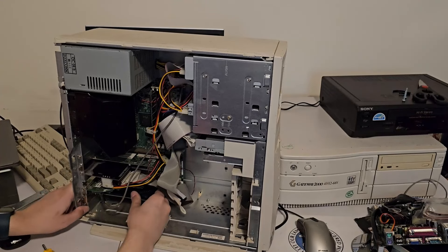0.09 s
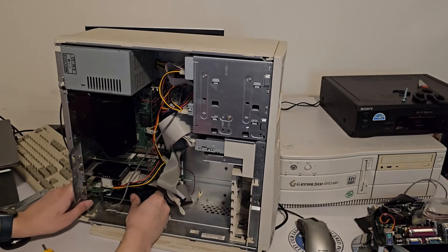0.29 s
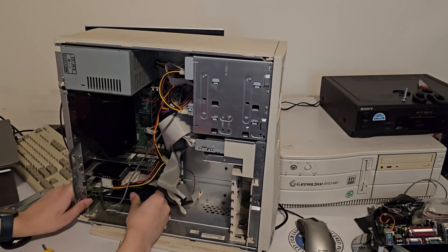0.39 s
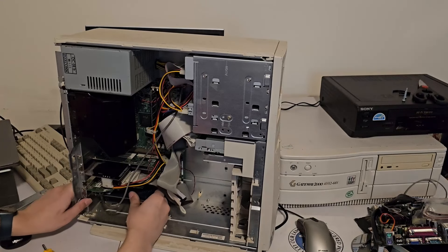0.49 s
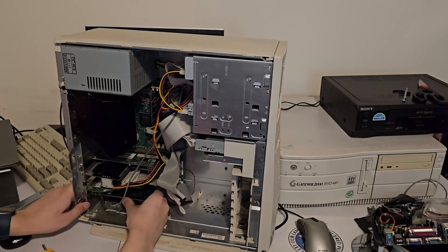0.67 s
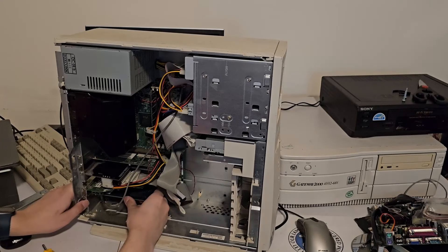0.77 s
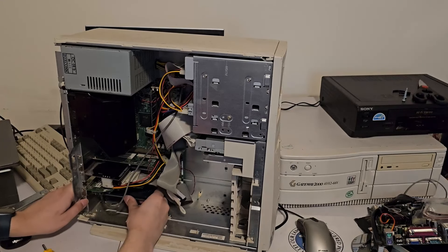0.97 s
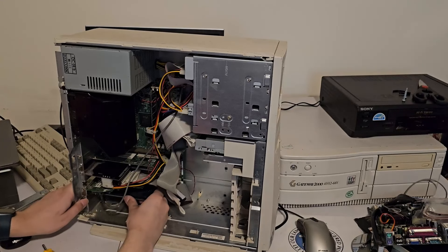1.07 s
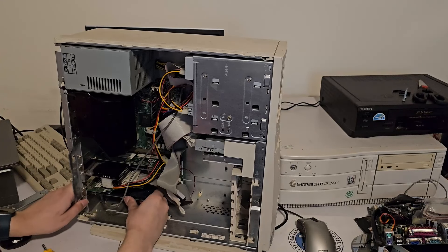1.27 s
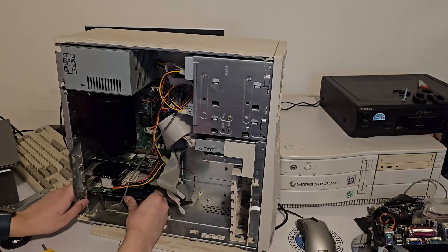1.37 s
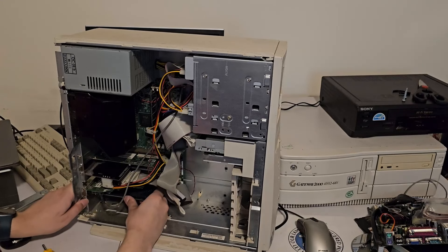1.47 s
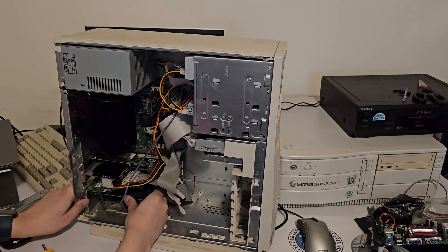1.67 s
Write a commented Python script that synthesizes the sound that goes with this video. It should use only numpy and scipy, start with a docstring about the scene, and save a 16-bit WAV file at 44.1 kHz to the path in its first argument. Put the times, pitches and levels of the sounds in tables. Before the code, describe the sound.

One hard metal snap against a thin steel case, with chattering contacts and a low desk thud, followed by very faint rubbing, a soft tick and a small late click, recorded close in a quiet room.

```python
"""A steel card bracket snaps into the slot frame of an open computer case on a desk, in a small room.
After one faint scrape it catches, slams home and chatters: noise bands make the clang and the ring,
and fading sine waves make the clear notes. A low sine swells as the desk shudders.
Faint scrapes, made of tiny random slips, and a soft tick follow as the card is pressed down.
A second, lighter click comes near the end. Shaped noise gives the quiet room throughout."""
import sys
import numpy as np
from scipy import signal
from scipy.fft import rfft, irfft
from scipy.io import wavfile

SR = 44100
rng = np.random.default_rng(int(sys.argv[2]) if len(sys.argv) > 2 else 0)


def output_pcm(signal):
    """Save a mono or channel-first signal as 16-bit PCM at the path in sys.argv[1].

    Samples are clipped to [-1, 1] before scaling.
    """
    pcm = np.clip(np.atleast_2d(signal).T, -1, 1) * 32767
    wavfile.write(sys.argv[1], SR, np.round(pcm).astype(np.int16))


N = 74970  # length of the scene in samples

# bracket striking the frame: start_s, level_db, extra_bass_db, extra_treble_db, extra_ring_db
BRACKET_KNOCKS = [(0.2121, -10, 12.5, -3.5, 2.5), (0.2158, -6.5, 8.5, 2, -3.5),
                  (0.2173, -.5, -8.5, 0.5, -2.5), (.2218, -5, 4.5, -3.5, -2), (.2335, -16, 3, 0, 0),
                  (1.1496, -41.5, 7, -18.5, -3), (1.5868, -25, -35, -16, -0.5), (1.5945, -27.5, -9, -9, -5),
                  (1.606, -35.5, -2, -4, -8.5), (1.642, -46, 9.5, -38, 5)]
# noisy sound of the sheet metal: pitch_hz, clang_db per octave, lingering_ring_db per octave
SHEET_METAL = [(70, -57, -60), (150, -65, -65.5), (207, -53.5, -47), (315, -47, -47.5), (400, -46, -46),
               (505, -30, -37.5), (796.6, -23.5, -34), (994, -26.5, -33.5), (1320, -30, -37.5),
               (1570, -26, -32), (2020, -27.5, -35.5), (2500, -31, -36), (3880, -24, -31.5),
               (5000, -22, -33), (6540, -26.5, -36), (7400, -19, -27.5), (10800, -34, -41.5),
               (12703, -25, -38.5), (16070, -24, -34)]
# how fast the first clang dies away: pitch_hz, time_to_fall_60_db_s
CLANG_FADE = [(400, .07), (900, 0.039), (2000, .05), (5000, 0.026), (14000, 0.031)]
# how fast the lingering ring dies away in the room: pitch_hz, time_to_fall_60_db_s
RING_FADE = [(150, .45), (400, 0.18), (1000, 0.17), (2000, 0.2), (4500, 0.26), (8000, 0.2), (15000, 0.19)]
# extra bass is full below BASS_HZ, extra treble above TREBLE_HZ; both reach zero at the middle
BASS_HZ, MIDDLE_LOW_HZ, MIDDLE_HIGH_HZ, TREBLE_HZ = 240, 850, 3750, 13000
RING_RISE_S = 0.0042
# the case keeps humming faintly after a blow (HUM_DB is relative to the ring)
HUM_DB, HUM_T60_S, HUM_HZ, HUM_OCTAVES = -27, 0.84, 1100, 2.0
RATTLE_DB = 2.5  # depth of the rattle, before the common and separate parts are mixed
RATTLE_SHARE = 0.64  # part of the rattle that all bands have in common


def knock(start_s, level_db, bass_db, treble_db, ring_db):
    """One contact: metal gives a short clang, a rattling ring and a faint hum, plus its clear notes."""
    t = np.arange(24000) / SR
    colour = [(BASS_HZ, bass_db), (MIDDLE_LOW_HZ, 0), (MIDDLE_HIGH_HZ, 0), (TREBLE_HZ, treble_db)]
    hz, noise = pair_noise(len(t))
    octave = np.log2(hz + 1)
    out = modes_ring(start_s, t, colour)
    common_rattle = rattle(t)
    swell = amp(ring_db) * (1 - np.exp(-t / RING_RISE_S))
    hum = amp(HUM_DB) * decay(t, HUM_T60_S)
    for centre in 62.5 * 2 ** (np.arange(25) / 3):  # one band every third of an octave
        # neighbouring bands overlap so that their powers add up evenly
        band_power = np.maximum(1 - 3 * abs(octave - np.log2(centre)), 0)
        band = irfft(noise * np.sqrt(band_power))
        clang = amp(read(SHEET_METAL, centre)) * decay(t, read(CLANG_FADE, centre))
        fade = decay(t, read(RING_FADE, centre)) + hum * hump(centre, HUM_HZ, HUM_OCTAVES)
        ring = amp(read(SHEET_METAL, centre, column=2)) * swell * fade
        wobble = RATTLE_SHARE * common_rattle + (1 - RATTLE_SHARE) * rattle(t)
        ring = ring * amp(RATTLE_DB * wobble)
        onset = np.minimum(t * centre, 1)  # rises over one cycle
        shape = np.sqrt(clang ** 2 + ring ** 2) * onset
        rms = np.sqrt(np.mean(shape ** 2) / 3)  # a third of an octave holds a third of its power
        out += evened(band * shape) * rms * amp(read(colour, centre)) * panned(centre)
    return amp(level_db) * out


# clear notes of the case panels: pitch_hz, relative_level_db, time_to_fall_60_db_s
PANEL_NOTES = [(197, -51.5, 0.45), (228, -53, .35), (356.7, -40, .25), (496.7, -38, 0.17),
               (545.7, -46, 0.3), (663.7, -42.5, .16), (745, -37, .14), (770, -41.5, 0.26),
               (856.4, -37.5, .14), (927, -41, 0.18), (1007, -38, .2), (1304, -41, .19), (1378, -41, .18),
               (1697, -45, 0.24)]
# clear notes of the bracket: pitch_hz, relative_level_db, time_to_fall_60_db_s
BRACKET_NOTES = [(2000, -42, 0.15), (2740, -45, .19), (3664, -39.5, 0.14), (4056, -41.5, .17),
                 (4850, -45, 0.17), (5500, -38.5, .15), (5430, -36, .12), (5924, -46, .17),
                 (7450, -39, 0.11), (7870, -40, 0.13)]
ALL_NOTES_DB = -2.5  # added to the level of every note


def modes_ring(start_s, t, colour):
    """Panels and bracket vibrate at set pitches; blows in quick succession build up one vibration."""
    out = np.zeros((2, len(t)))
    for hz, db, t60_s in PANEL_NOTES + BRACKET_NOTES:
        # less likeness between the microphones means a wider phase gap
        phase_gap = np.array([[.5], [-.5]]) * np.arccos(read(LIKENESS_BY_PITCH, hz))
        # the phase follows scene time, so every blow drives the same vibration
        wave = np.sin(2 * np.pi * hz * (start_s + t) + phase_gap)
        envelope = np.minimum(t * hz / 2, 1) * decay(t, t60_s)  # rises over two cycles
        out += wave * envelope * amp(ALL_NOTES_DB + db + read(colour, hz)) * panned(hz)
    return out


RATTLE_TOP_HZ = 89


def rattle(t):
    """Uneven rattling of the ring: slow and fast sine waves add up to a wobble of about rms 1."""
    rates_hz = RATTLE_TOP_HZ * np.geomspace(.1, 1, 12)
    phases = rng.random(12)
    coarse = t[::60]  # the wobble is slow enough to work out at every 60th sample
    waves = np.sin(2 * np.pi * (coarse[:, None] * rates_hz + phases))
    return np.interp(t, coarse, evened(waves.sum(1)))


# bracket and card edge rubbing: start_s, length_s, level_db, centre_hz, width_octaves,
# singing_hz, singing_db (relative to the rasp)
RUBS = [(0.0, 0.016, -72.5, 1480, 1.16, 528, -3), (.437, .05, -67, 801, 1.77, 930, -14),
        (.559, 0.018, -68, 4420, 4.9, 767, 3), (.74, 0.025, -70.5, 690, 1.33, 890, -6.5),
        (0.869, 0.029, -69, 1390, 1.4, 1410, -6.5), (.971, 0.019, -69, 5870, 0.48, 4830, -7.5),
        (.973, 0.017, -72, 2500, 1.2, 1284, -4.5), (1.099, 0.013, -73.5, 850, 0.66, 760, -3),
        (1.147, 0.0063, -65.5, 1630, 0.12, 1600, -2), (1.149, .016, -68, 453, 1.1, 229, -9),
        (1.582, .004, -60, 3700, 0.23, 4400, 2), (1.668, 0.024, -70, 830, 0.74, 794, -3.5)]
SLIPS_PER_S, SLIP_SPREAD_DB = 860, 2.5
CASE_T60_S, ROOM_T60_S = 0.051, 0.2  # times for the case and the room to fall by 60 dB
SCRAPE_ROOM_DB = 1.5  # room part relative to the case part
SING_WIDTH_HZ = 55


def scrape(length_s, level_db, centre_hz, octaves, sing_hz, sing_db):
    """Rubbing is a swell of tiny slips that ring in case and room; one resonance of the part sings."""
    t = np.arange(2 ** 14) / SR
    stroke = np.sqrt(np.sin(np.pi * np.minimum(t / length_s, 1)))
    happens = rng.random(len(t)) < SLIPS_PER_S / SR
    strength = amp(SLIP_SPREAD_DB * rng.standard_normal(len(t)))
    direction = rng.choice([-1, 1], len(t))
    slips = stroke * happens * strength * direction
    hz, noise = pair_noise(len(t))
    fade = evened(decay(t, CASE_T60_S)) + amp(SCRAPE_ROOM_DB) * evened(decay(t, ROOM_T60_S))
    # multiplying spectra lets every slip set off the fading noise
    rub = rfft(slips) * rfft(irfft(noise) * fade)
    rasp = evened(irfft(rub * hump(hz, centre_hz, octaves) / np.sqrt(hz + centre_hz)))
    sing = evened(irfft(rub / (1 + 2j * (hz - sing_hz) / SING_WIDTH_HZ)))
    length_gain = np.sqrt(length_s / t[-1])  # a longer stroke carries more energy
    return amp(level_db) * (rasp + amp(sing_db) * sing) * length_gain * panned(centre_hz)


# desk and side panel flexing under the hand:
# start_s, pitch_hz, level_db, rise_s, time_to_fall_60_db_s
DESK_AND_PANEL_FLEXES = [(0.264, 42.5, -49, 0.032, 0.53), (.44, 234.8, -54.5, 0.017, 0.31),
                         (1.181, 226.7, -59, 0.0079, 0.11)]


def flex(hz, level_db, rise_s, t60_s):
    """The desk or panel bends and sways back: one low note that swells and dies away."""
    t = np.arange(SR) / SR
    wave = np.sin(2 * np.pi * hz * t)
    envelope = np.minimum(t / rise_s, 1) * decay(np.maximum(t - rise_s, 0), t60_s)
    return amp(level_db) * wave * envelope * panned(hz)


# tone of the quiet room: pitch_hz, relative_level_db per Hz
ROOM_TONE = [(15, -4), (40, 2), (80, -10.5), (125, -8), (170, -16.5), (230, -13), (320, -23), (700, -27),
             (2100, -32), (4800, -35), (6500, -44), (10000, -49), (15000, -47)]
ROOM_DB, ROOM_LEFT_DB = -64.5, 1.7  # mean level of the two sides; left minus right


def room():
    """Random air sound: steady low rumble and faint hiss, a little to the left."""
    hz, noise = pair_noise(N)
    side_db = np.array([[.5], [-.5]]) * ROOM_LEFT_DB
    return amp(ROOM_DB + side_db) * evened(irfft(noise * amp(read(ROOM_TONE, hz)), N))


# how alike the two microphones hear: pitch_hz, likeness (1 same, 0 unrelated, -1 opposite)
LIKENESS_BY_PITCH = [(60, .91), (150, .975), (350, .96), (640, .86), (950, .58), (1350, .1), (2800, -.22),
                     (5000, -.08), (8000, 0), (15000, -.12)]


def pair_noise(size):
    """Frequencies and white noise spectra at the two microphones, alike in the bass."""
    hz = np.fft.rfftfreq(size, 1 / SR)
    mid, side = rfft(rng.standard_normal((2, size)))
    same = read(LIKENESS_BY_PITCH, hz)
    return hz, mid * np.sqrt(1 + same) + np.array([[1], [-1]]) * side * np.sqrt(1 - same)


# balance of sound from the slot frame: pitch_hz, left_minus_right_db
FRAME_BALANCE = [(100, 1), (700, 1.9), (2400, 0.5), (4400, 0.74), (8000, 2.44), (11000, 3.5), (15000, 7.5)]


def panned(hz):
    """Gains of the left and right microphone for sound from the slot frame."""
    return amp(np.array([[.5], [-.5]]) * read(FRAME_BALANCE, hz))


def amp(db):
    """Turns decibels into gain."""
    return 10 ** (np.asarray(db) / 20)


def decay(t, t60_s):
    """Falls by 60 dB in t60_s seconds."""
    return np.exp(-np.log(1000) * t / t60_s)


def hump(hz, centre_hz, octaves):
    """A bell curve along log frequency."""
    return np.exp(-.5 * (np.log2((hz + 1) / centre_hz) / octaves) ** 2)


def read(points, hz, column=1):
    """Reads one column of a table between its points, along log frequency."""
    table = np.transpose(points)
    return np.interp(np.log(hz + 1), np.log(table[0] + 1), table[column])


def evened(x):
    """Scales each channel to rms 1."""
    return x / np.sqrt(np.mean(x ** 2, -1, keepdims=True) + 1e-20)


def add(mix, start_s, sound):
    """Mixes a stereo sound in at a time, cut off at the end of the scene."""
    part = mix[:, round(start_s * SR):][:, :sound.shape[-1]]
    part += sound[..., :part.shape[1]]


def scene():
    """Knocks, scrapes and flexing over the quiet room."""
    mix = room()
    for start_s, *settings in BRACKET_KNOCKS:
        add(mix, start_s, knock(start_s, *settings))
    for start_s, *settings in RUBS:
        add(mix, start_s, scrape(*settings))
    for start_s, *settings in DESK_AND_PANEL_FLEXES:
        add(mix, start_s, flex(*settings))
    return mix


EDGE_HZ = 16100


def record(dry):
    """The recorder's band limit: a low-pass filter takes away the highest treble."""
    low_pass = signal.firwin(255, EDGE_HZ, window=("kaiser", 8), fs=SR)
    return signal.oaconvolve(dry, low_pass[None], "same")


dry = scene()
out = record(dry)
output_pcm(out)
```